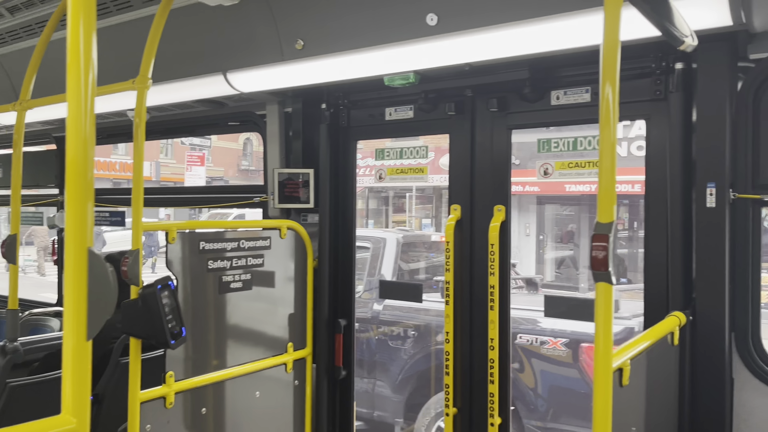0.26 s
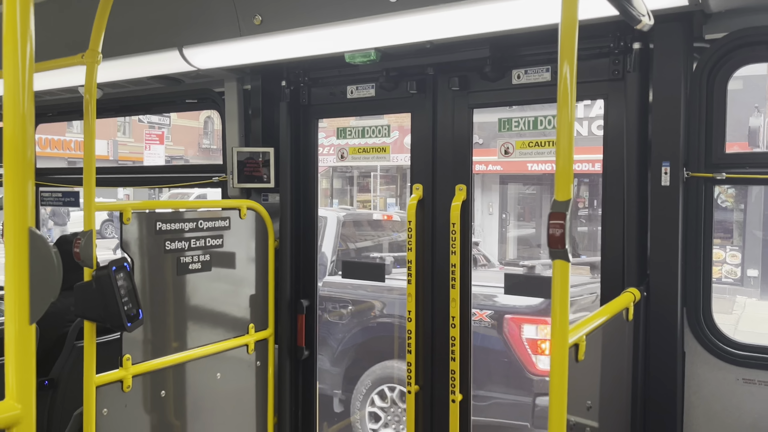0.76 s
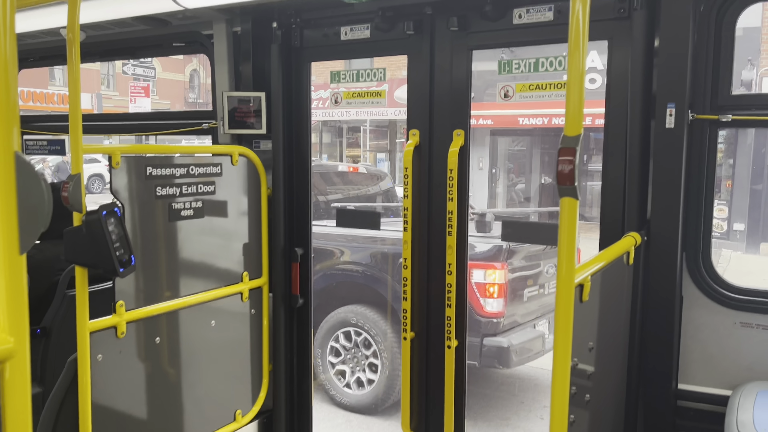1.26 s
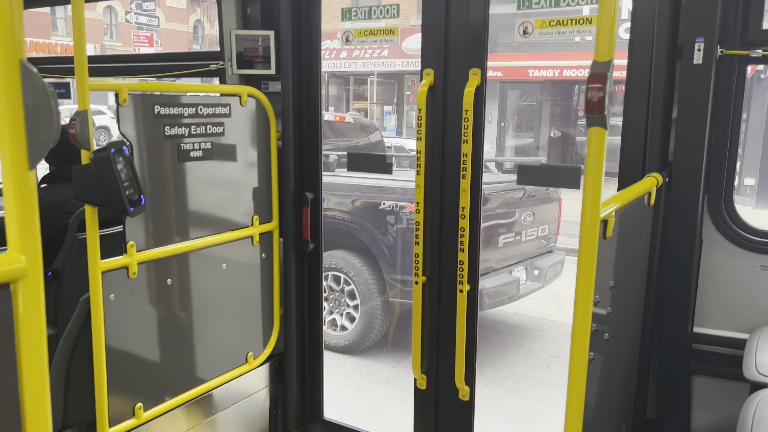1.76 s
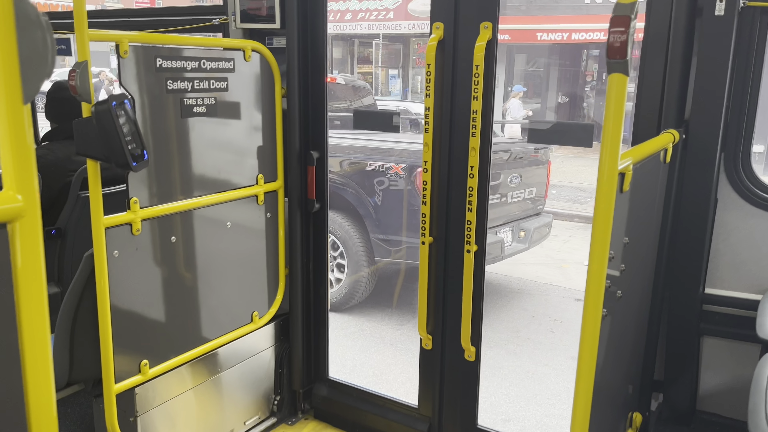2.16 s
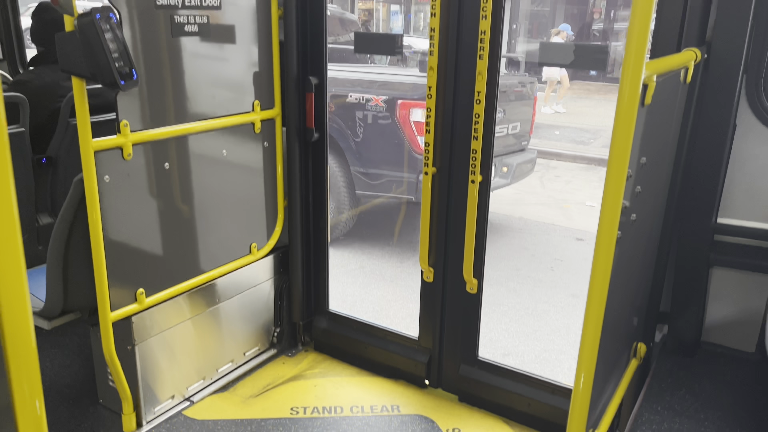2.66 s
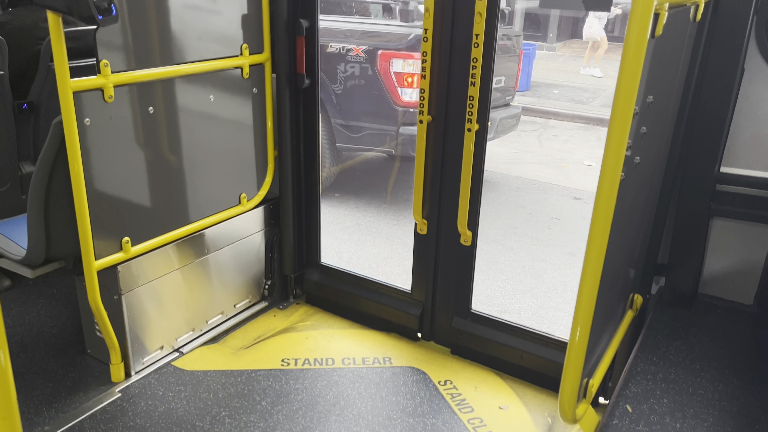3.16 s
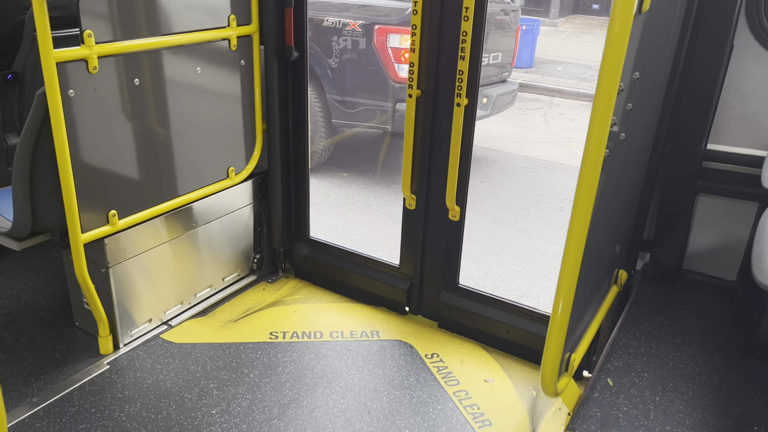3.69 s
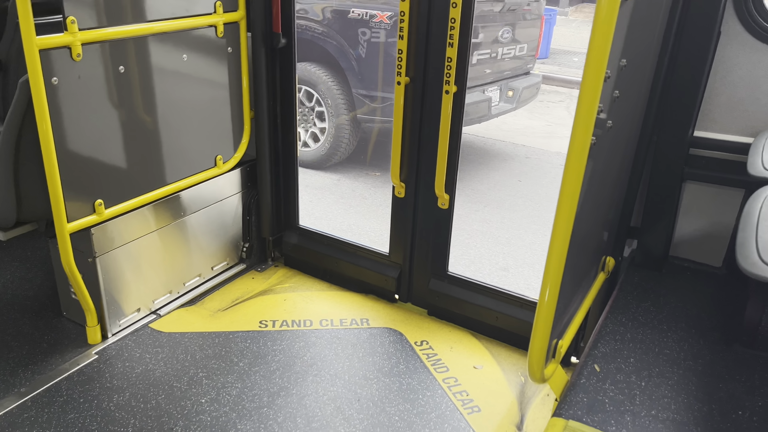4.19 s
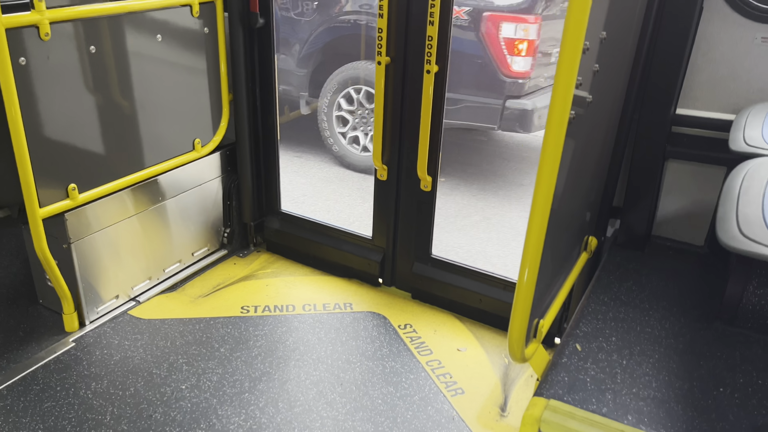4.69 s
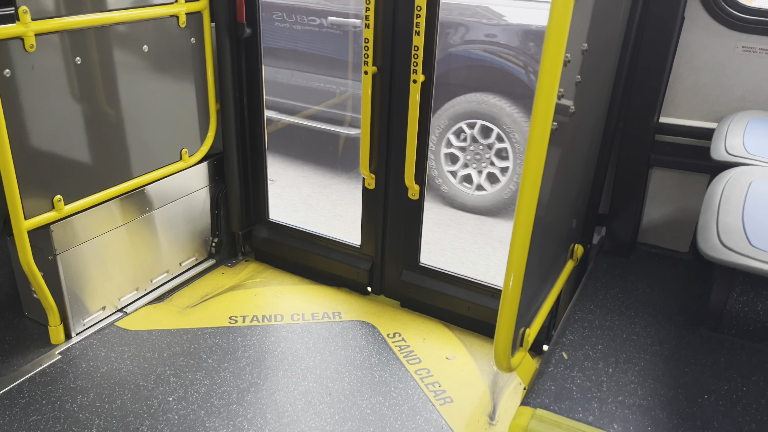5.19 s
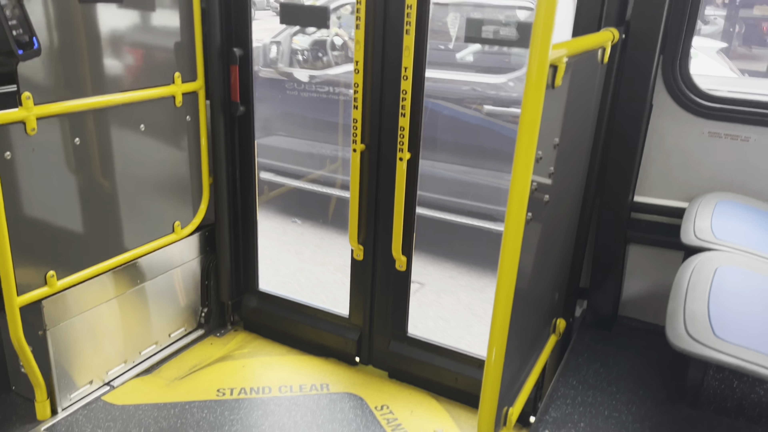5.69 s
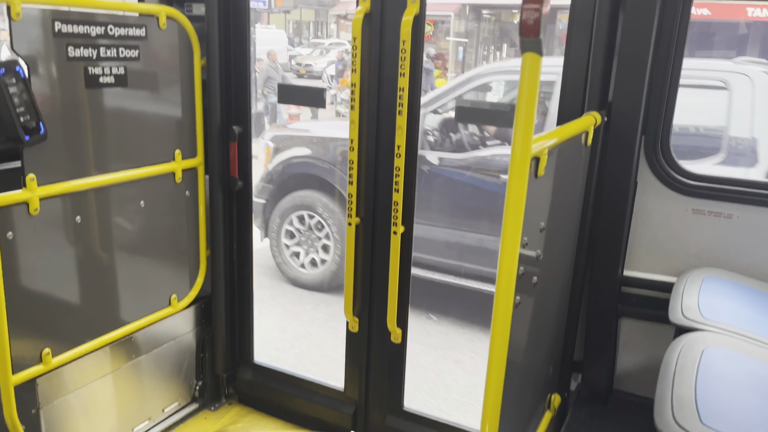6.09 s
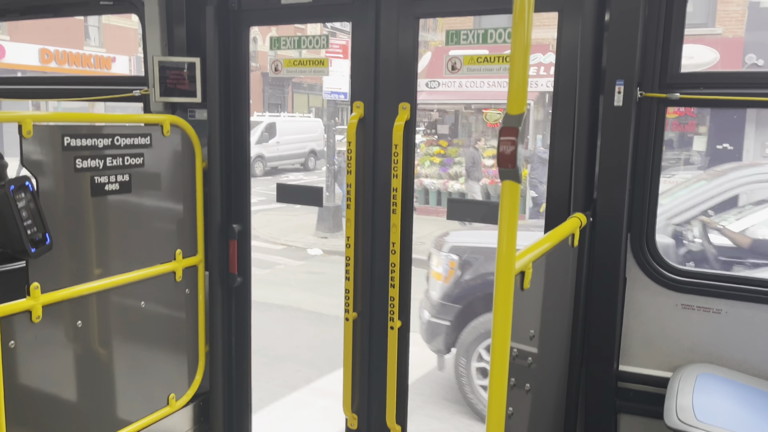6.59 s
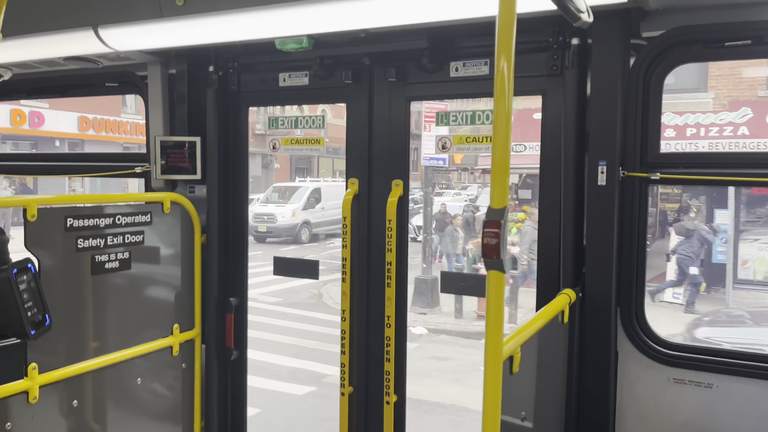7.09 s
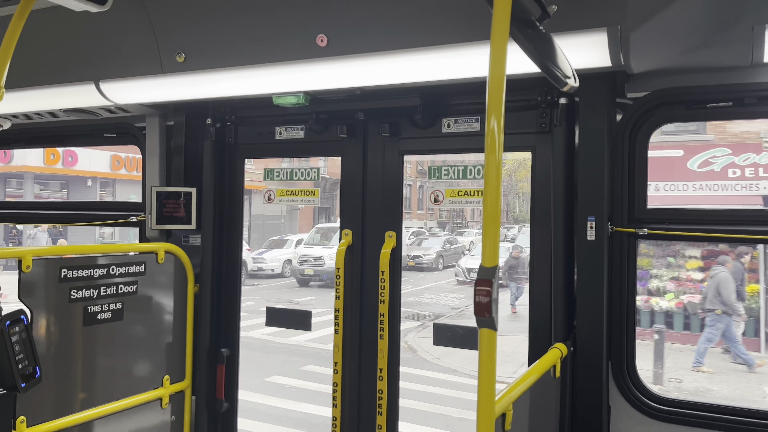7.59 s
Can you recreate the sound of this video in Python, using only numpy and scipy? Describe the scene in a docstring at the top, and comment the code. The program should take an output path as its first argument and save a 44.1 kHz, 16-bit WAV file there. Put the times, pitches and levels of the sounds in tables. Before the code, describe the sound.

Steady cabin hum, airy ventilation and soft bumps, then an electric drive rises from deep throb to smooth mid-low whine, booming on the way.

```python
"""Inside an electric bus near the rear door, heard by a hand-held phone: it creeps along, then pulls away.
The drive is a sine whose pitch rises with speed and booms on each cabin resonance that it crosses.
Hum, whines and fan tones are sines; the whines change level as the phone is lowered and lifted.
Floor rumble, tyre roar, rushing air and wind are shaped noise, diffuse at the phone's two ports.
Soft bumps, clicks, short hisses, a squeak, a whirr and a thin inverter whine come and go."""
import sys
import numpy as np
from scipy import signal
from scipy.fft import rfft, irfft
from scipy.io import wavfile
from scipy.ndimage import uniform_filter1d

SR = 44100
rng = np.random.default_rng(int(sys.argv[2]) if len(sys.argv) > 2 else 0)


def store_wav(level_fs):
    """Save 16-bit WAV to argv[1]."""
    pcm = np.round(np.clip(np.atleast_2d(level_fs), -1, 1) * 32767)
    wavfile.write(sys.argv[1], SR, pcm.T.astype(np.int16))


N = 346185
T = np.arange(N) / SR
FREQ = np.fft.rfftfreq(N, 1 / SR) + 1e-3  # kept above zero for the logarithms

# Drive tone, proportional to the speed of the bus: (time [s], pitch [Hz])
DRIVE_PITCH = [(3.5, 25.2), (3.85, 41.8), (4.19, 63.9), (5.75, 189.2), (6.3, 226.8), (6.88, 260.5),
               (7.85, 296.1)]
# Weaker orders of the drive, before the cabin response:
# (multiple of the pitch [1], loudest at [s], half length [s], level against the main tone [dB])
DRIVE_ORDERS = [(3.12, 4.14, 0.45, -10), (.333, 6.3, 0.94, -11), (.75, 6.5, 0.15, -19.5),
                (2.07, 7.8, 0.22, -19)]
# Stereo place of the drive tone: (pitch [Hz], left minus right [dB])
DRIVE_PAN = [(88, 0), (106, 3), (128, 6.5), (145, 1.5), (260, -3)]
# Cabin resonances crossed by the drive: (centre [Hz], width [Hz], rms of the tone from this mode alone [dB])
CABIN_MODES = [(47, 12, -34.5), (55, 7, -30), (64.2, 7.5, -20.5), (73.9, 8.7, -20.5), (83.5, 6.2, -29),
               (87, 8.5, -27.5), (97.6, 9.1, -26.5), (108.7, 11, -25), (123.5, 12, -25.5),
               (131.1, 8.2, -23.5), (140.3, 6.2, -27), (174.4, 6.8, -24), (182.5, 9.9, -23),
               (188.3, 5.9, -23.5), (203.6, 5.8, -32.5), (211.8, 11.2, -29.5), (223.5, 12, -39),
               (263.3, 15, -43), (288, 23.3, -36.5), (610, 40, -29)]
# Compressor hum: (time [s], rms, mean of both ports [dB], left minus right [dB])
HUM_LEVEL = [(.7, -40, 5), (1.6, -35.5, 3), (3.2, -31.5, 0), (4.5, -36, 3.5), (6.4, -36.5, 3),
             (6.9, -42, 7), (7.4, -37.5, 11), (7.85, -43, 10)]
# Steady whines, before the standing-wave changes: (pitch [Hz], left peak [dB], right peak [dB],
# left lead at even steps of the phone from raised to lowered [rad])
WHINES = [(415.4, -44.5, -44.5, (-.3, .2, .7, 0, .2, .5, .3)),
          (431.9, -36.8, -37, (-.8, -.4, -.2, .1, -.6, -.5, -.6)),
          (699.7, -58, -58, (-3.8, -1.2, 1.2, 2.8, 2.1, 2, 1.9)),
          (863.8, -42, -46.5, (-2.4, -2.8, -3.6, -1.5, .6, .4, -.4)),
          (1049.7, -46, -52, (2.3, 1.5, 1.4, 1.8, 1.9, 2.6, 3.7)),
          (1295.6, -41.5, -39.5, (.4, 1.3, 1.8, 1.6, 3, 2.8, 2.6)),
          (1421.2, -48.5, -49.5, (-2.4, -1.7, -2, -2.4, -1.1, -.2, -.7)),
          (1727.7, -51.5, -51.5, (2.8, 2, -.2, -1.2, -1.4, -2.4, -1.7))]
# Nodes and crests of the standing waves, listed under the pitch of each tone [Hz]:
# (time [s], half length [s], left change [dB], right change [dB])
NODES = {415.4: [(.85, .45, 9, 8), (7.3, .5, 4, 0)], 431.9: [(.4, .75, 0, -24), (6.5, .5, 4, 0),
         (7.6, .65, 0, -15)], 699.7: [(4.4, 1.2, 10, 11)], 863.8: [(.8, .9, -9, -5), (2.25, .22, -18, 0),
         (6.42, .17, -15, 0), (7.4, .7, -13, -9)], 1049.7: [(.9, .65, -15, -7), (3.3, .6, 3, -11),
         (4.4, .07, -12, 0), (5.15, .22, -15, -10), (6, .13, -16, -2), (6.8, .35, 0, 2), (7.9, .5, -9, 0)],
         1295.6: [(.3, .7, -2, -3), (1.4, .3, -2, -4), (2, .34, -18, -20), (2.58, .1, -12, 0),
         (6.55, .25, -16, -7), (7.2, 1.6, -8, -8), (7.65, .4, 3, 3)], 1421.2: [(1.95, .25, -14, -12),
         (2.9, .6, -6, -8), (6.8, .65, -12, -13)], 1727.7: [(1, .4, -9, 0), (1.8, .13, 0, -18),
         (2.2, .18, -4, -3), (3.8, .4, -3, -22), (5.95, .15, -18, -12), (6.45, .2, 3, 2),
         (7.1, .2, -7, -4)], 2327.5: [(1.4, .25, 6, 2)], 2437: [(3.1, .18, 8, 3), (3.9, .28, 9, 6)],
         5183: [(.4, .4, 3, 4), (3.05, .12, 6, 0), (3.8, .1, 4, 0), (6.95, .3, 7, 0)]}
# Height of the phone as the hand lowers and lifts it: (time [s], 0 raised to 1 lowered [1])
PHONE_DIP = [(0, .05), (1.1, .07), (1.9, .39), (2.4, .56), (3.3, .73), (4.6, .98), (5.7, .94), (6.3, .47),
             (7, .26), (7.3, .14), (7.85, .1)]
# Soft bumps through the floor: (time [s], centre [Hz], rms at the peak [dB], half length [s])
BUMPS = [(0.143, 82.9, -24.5, 0.018), (0.786, 82, -26, 0.03), (1.456, 97.9, -25.5, 0.014),
         (2.31, 331, -43, .025), (2.336, 220.3, -34, 0.035), (2.442, 172, -39, 0.042),
         (2.527, 191, -32, 0.02), (2.578, 80.2, -33, 0.015), (6.967, 155, -35.5, 0.044),
         (7.415, 99.4, -29.5, 0.026)]
# Clicks of loose fittings: (time [s], centre [Hz], width [Hz], level before the envelope [dB], decay [s])
CLICKS = [(2.3, 2450, 250, -52, .09), (2.405, 2500, 400, -42.5, .008), (2.498, 3800, 2000, -47.5, .003),
          (2.549, 3000, 1800, -45, .005), (4.229, 3800, 2500, -44, .002), (6.03, 4800, 2500, -50, .002),
          (6.1047, 4700, 1200, -46, .002), (6.936, 6000, 4030, -54, .002), (7.564, 1650, 400, -37, .005),
          (7.577, 800, 450, -37, 0.0071), (7.631, 1500, 450, -45, .007), (7.648, 1550, 400, -46, .006),
          (7.698, 850, 500, -47, .007)]
# Short hisses and ticks: (time [s], level [dB], rise [s], decay time constant [s], treble share [dB])
HISSES = [(.74, -4.5, .01, 0.068, -20), (2.36, -9.5, .07, 0.067, 6), (2.44, -8.5, 0.057, 0.17, 1.5),
          (3.24, -15, 0.033, 0.055, 6), (3.315, -12, .006, 0.064, 10.5), (3.48, -19, .06, 0.083, 9),
          (4.229, -0.5, 0.01, 0.075, 5.5), (4.28, -16, .025, 0.04, 0), (5.88, -13, .1, 0.1, 2),
          (6.03, -10, .005, 0.049, 6), (6.104, -11.5, .003, 0.043, 9.5), (6.936, -10, 0.0018, 0.052, 8),
          (7.628, -5, 0.011, 0.053, -2), (7.718, -9, .001, 0.036, 2)]
# Squeak of a panel, one row: (time [s], centre [Hz], rms at the peak [dB], half length [s])
SQUEAK = (7.549, 1590, -45.5, .013)
# Two passes of a faint whirr: (loudest at [s], top pitch [Hz], rms at the peak [dB])
WHIRR = [(2.05, 1562, -53.5), (6.85, 1560, -54.5)]
# Surfacings of the inverter whine, before panning: (loudest at [s], half length [s], peak [dB])
INVERTER = [(4.93, .12, -65), (5.9, 0.11, -60), (6.62, .12, -60), (7.5, .2, -62)]
# Fan tones, before fading and standing waves: (pitch [Hz], peak [dB], left minus right [dB])
FAN_TONES = [(721, -56.5, 0), (960, -61, 3), (2327.5, -62.5, 2), (2437, -65, 3), (4320, -72, 6),
             (5183, -71, 7)]
# Cabin resonances kept ringing by road and air:
# (centre [Hz], width [Hz], rms at even steps of the phone from raised to lowered [dB])
BOOMS = [(223, 40, (-53, -58, -52, -44, -43.5)), (543, 40, (-49.5, -49.5, -61, -64, -62.5)),
         (749, 220, (-58, -72, -57, -54.5, -54))]
# Noise spectra, before the level changes in their functions: (frequency [Hz], density [dB per Hz])
RUMBLE = [(15, -100), (22, -83), (32, -67), (45, -56.5), (62, -53), (80, -54), (95, -56), (140, -59.5),
          (175, -60), (200, -69), (270, -67.5), (400, -82.5), (900, -100)]
TYRES = [(100, -88), (200, -71), (270, -68), (330, -65.5), (390, -66.5), (490, -68.5), (610, -80),
         (850, -80), (1200, -80), (2500, -100)]
WIND = [(450, -79), (620, -71), (850, -79), (1200, -83), (1900, -87.5)]  # at full speed
AIR = [(150, -100), (400, -76.5), (800, -72), (1050, -76.5), (1500, -74.5), (1950, -79.5), (2450, -78.5),
       (3200, -86.5), (4200, -89), (5200, -93.5), (6500, -101), (8000, -108), (10000, -105.5),
       (13000, -107.5), (14000, -114)]
VENT = [(1200, -100), (2400, -90.5), (3200, -86.5), (4300, -84), (5200, -89.5), (6500, -96), (8000, -116)]  # at the left port
HISS = [(1500, -87), (2600, -77), (4500, -78.5), (6500, -88), (8200, -101), (10500, -94.5), (13000, -98.5),
        (15000, -102)]


def drive(left_lag_ms=0.19, flutter_db=0.9):
    """Forced resonance: a tone locked to speed, with its weaker orders, excites the cabin modes it crosses."""
    pitch = curve(DRIVE_PITCH)
    phase = turn(pitch * (1 + 0.0015 * walk(20)))
    moving = np.clip(2 * (pitch / pitch[0] - 1), 0, 1)  # silent at the starting pitch
    pan_db = np.interp(pitch, *np.transpose(DRIVE_PAN))
    strength = moving * cabin_response(pitch) * undb(flutter_db * walk(25) + sides(pan_db))
    out = strength * np.sin(phase + lag_phase(pitch, left_lag_ms))
    for multiple, s, half_length, db in DRIVE_ORDERS:
        strength = undb(db) * swell(s, half_length) * cabin_response(multiple * pitch)
        out = out + strength * np.sin(multiple * phase + 0.34 * walk(25))
    return np.sqrt(2) * out  # rms to peak


def cabin_response(pitch):
    """Modal superposition: the powers of all the cabin resonances add at the given pitch."""
    power = 0
    for hz, width_hz, db in CABIN_MODES:
        detuning = (pitch - hz) / width_hz
        power = power + (undb(db) / (1 + 2 * detuning ** 2) ** 2) ** 2
    return np.sqrt(power)


def compressor_hum(hum_hz=107.97, left_lead_rad=0.14):
    """Periodic rotation: the compressor's hum is one sine of nearly constant pitch."""
    shaft = turn(hum_hz + 0.15 * walk(3.88))
    pan_db = curve(HUM_LEVEL, axis=2)
    return np.sqrt(2) * undb(curve(HUM_LEVEL) + sides(pan_db)) * np.sin(shaft + sides(left_lead_rad))


def machine_whines(waver_db=1, phase_waver_rad=0.09):
    """Standing waves: steady compressor and fan whines vary in level and phase with the phone's place."""
    out = 0
    for hz, left_db, right_db, leads in WHINES:
        db = np.array([[left_db], [right_db]]) + standing(hz) + waver_db * walk(5.9)
        phase = 2 * np.pi * (hz * T + rng.random()) + phase_waver_rad * walk(16)
        out = out + undb(db) * np.sin(phase + sides(at_phone(leads)))
    return out


def bumps(pitch_spread=0.1384):
    """Impulsive excitation: each bump shakes the body for a few uneven cycles."""
    out = 0
    for s, hz, db, half_length in BUMPS:
        shake = np.sqrt(2) * np.sin(turn(hz * (1 + pitch_spread * walk(150))))
        out = out + undb(db) * swell(s, half_length) * shake
    return out


def clicks(rise_s=0.00055):
    """Damped vibration: loose fittings click with a sharp onset and an exponentially dying ring."""
    out = 0
    for s, hz, width_hz, db, decay in CLICKS:
        out = out + undb(db) * burst(s, rise_s, decay) * narrow(hz, width_hz)
    return out


def hisses(split_hz=7000, grain_db=1.2):
    """Transient broadband noise: short hisses, whose treble above the split is one signal at both ports."""
    low_pass = signal.butter(4, split_hz, fs=SR, output="sos")
    high_pass = signal.butter(4, split_hz, "high", fs=SR, output="sos")
    body = signal.sosfilt(low_pass, diffuse(HISS, likeness=0.74))
    top = signal.sosfilt(high_pass, diffuse(HISS, likeness=.8)[0])
    out = 0
    for s, db, rise, decay, treble_db in HISSES:
        out = out + undb(db) * burst(s, rise, decay) * (body + undb(treble_db) * top)
    return out * undb(grain_db * walk(120))


def panel_squeak(width_hz=230):
    """Narrow-band vibration: one rough squeak of a panel, independent at the two ports."""
    s, hz, db, half_length = SQUEAK
    return undb(db) * swell(s, half_length) * narrow_pair(hz, width_hz)


def whirr(half_length_s=.45, sag_hz=28, width_hz=36):
    """Narrow-band noise on a parabolic glide: a faint whirr rises to its top pitch and sinks again."""
    out = 0
    for s, hz, db in WHIRR:
        away = ((T - s) / half_length_s) ** 2
        out = out + undb(db) * np.exp(-away / 2) * narrow_pair(hz - sag_hz * away, width_hz)
    return out


def inverter(whine_hz=4000, pan_db=9, waver_hz=3):
    """Switching tone: the inverter's thin whine, stronger on the left, surfaces at the listed times."""
    strength = sum(undb(db) * swell(s, half_length) for s, half_length, db in INVERTER)
    phase = turn(whine_hz + waver_hz * walk(20))
    lead = 2 * walk(2.02)
    return strength * undb(sides(pan_db)) * np.sin(phase + sides(lead))


def fan_tones(fading_db=2.2, waver_hz=2.5):
    """Fading of short waves: faint fan tones whose level, pitch and lead between the ports wander."""
    out = 0
    for hz, db, pan_db in FAN_TONES:
        lead = np.pi / 2 + 0.6 * walk(2.52)
        strength = undb(db + standing(hz) + fading_db * walk(8.7) + sides(pan_db))
        out = out + strength * np.sin(turn(hz + waver_hz * walk(8)) + sides(lead))
    return out


def cabin_booms():
    """Noise-driven resonance: narrow bands kept ringing, their levels set by the phone's place."""
    out = 0
    for hz, width_hz, places_db in BOOMS:
        out = out + undb(at_phone(places_db)) * narrow(hz, width_hz)
    return out


def floor_rumble(waver_db=-1.23):
    """Structure-borne noise: the road's low rumble through the floor grows with speed."""
    level_db = with_speed(creeping_db=-1.27, added_db=2.2) + waver_db * walk(2.11)
    return diffuse(RUMBLE, likeness=0.76, left_lag_ms=.35) * undb(level_db)


def tyre_roar(pan_db=1.0, waver_db=0.97):
    """Rolling noise: tyre roar, whose added level sets in only near full speed."""
    level_db = with_speed(creeping_db=0.95, added_db=2.6, power=12) + waver_db * walk(10)
    return diffuse(TYRES, likeness=1.0, left_lag_ms=.17) * undb(level_db + sides(pan_db))


def wind(waver_db=3.5, speed_power=0.67):
    """Flow noise: air streams past the body with an amplitude that follows a power of the speed."""
    return diffuse(WIND, likeness=0.32) * speed() ** speed_power * undb(waver_db * walk(6))


def air_conditioning(vent_pan_db=18, air_waver_db=.4, vent_waver_db=0.35, duct_echo=0.13):
    """Turbulent noise and comb filtering: diffuse air and a left vent, coloured by short duct echoes."""
    air_db = with_speed(creeping_db=-2.92, added_db=0.21) + air_waver_db * walk(9)
    air = diffuse(AIR, likeness=0.13) * undb(air_db)
    # the left port keeps its level; only the right one is lowered
    vent_db = sides(vent_pan_db) - vent_pan_db / 2 + vent_waver_db * walk(4)
    flow = air + diffuse(VENT, likeness=.3) * undb(vent_db)
    lags = rng.integers(SR // 300, SR // 40, size=6)  # samples
    echoes = sum(np.roll(flow, lag, axis=1) for lag in lags)
    return flow + duct_echo * echoes


def speed():
    """Proportionality of pitch and speed: the bus speed as a share of the highest that it reaches."""
    pitch = curve(DRIVE_PITCH)
    return pitch / pitch.max()


def with_speed(creeping_db, added_db, power=1):
    """Speed law: a base level in dB and a part that grows with a power of the speed."""
    return creeping_db + added_db * speed() ** power


def at_phone(places):
    """Spatial sampling: a quantity of the sound field, followed between raised and lowered phone."""
    return np.interp(curve(PHONE_DIP), np.linspace(0, 1, len(places)), places)


def standing(hz):
    """Nodes and crests: change in dB at each port as the phone drifts through one standing wave."""
    return sum(np.outer(change_db, swell(s, half_length))
               for s, half_length, *change_db in NODES.get(hz, []))


def diffuse(spectrum, likeness, left_lag_ms=0, port_gap_m=0.27, sound_speed=343):
    """Diffuse-field coherence: noise alike at two spaced ports in the bass, unrelated higher up."""
    hz, db = np.transpose(spectrum)
    octaves_outside = np.abs(np.log2(FREQ / np.clip(FREQ, hz[0], hz[-1])))
    density_db = np.interp(np.log(FREQ), np.log(hz), db) - 20 * octaves_outside
    gain = undb(density_db) * np.sqrt(SR / 2)
    alike = np.clip(likeness, 0, 1) * np.sinc(2 * FREQ * port_gap_m / sound_speed)
    shares = np.sqrt([(1 + alike) / 2, (1 - alike) / 2])
    mid, side = rfft(rng.standard_normal((2, N))) * gain * shares
    ports = np.array([mid + side, mid - side])
    return irfft(ports * np.exp(1j * lag_phase(FREQ, left_lag_ms)), N)


def lag_phase(hz, left_lag_ms):
    """Propagation delay: phase at each port of a wave that reaches the left one later."""
    return sides(-2 * np.pi * hz * left_lag_ms / 1000)


def sides(difference):
    """Symmetric stereo split: half of a left-minus-right difference to each channel."""
    return np.array([[.5], [-.5]]) * difference


def narrow(hz, width_hz):
    """Quadrature modulation: two slow random walks on sine and cosine give a noise band of rms near 1."""
    phase = turn(hz + np.zeros(N))
    return walk(width_hz) * np.sin(phase) + walk(width_hz) * np.cos(phase)


def narrow_pair(hz, width_hz):
    """Incoherence: independent narrow bands at the two ports."""
    return np.array([narrow(hz, width_hz) for _ in range(2)])


def burst(start, rise, decay):
    """Exponential decay: an envelope that swells up to its start time and then dies away."""
    age = T - start
    return np.exp(np.where(age < 0, -(age / rise) ** 2, -age / decay))


def swell(centre, half_length):
    """Gaussian envelope: a bell whose standard deviation is the half length."""
    return np.exp(-((T - centre) / half_length) ** 2 / 2)


def turn(hz):
    """Phase as the integral of frequency, in radians, from a random start."""
    return 2 * np.pi * (np.cumsum(hz) / SR + rng.random())


def walk(rate):
    """Smoothed random steps: a wander with a spread near 1, at the given steps per second."""
    k = int(SR / max(rate, .5))
    held = np.repeat(rng.standard_normal(N // k + 2), k)
    smooth = uniform_filter1d(uniform_filter1d(held, k), k)
    return 1.248 * smooth[:N]  # restores the spread lost in smoothing


def curve(rows, axis=1):
    """Linear interpolation: one column of a table, joined by straight lines in time."""
    rows = np.array(rows)
    return np.interp(T, rows[:, 0], rows[:, axis])


def undb(db):
    """Logarithmic level: decibels to amplitude gain."""
    return np.exp(np.asarray(db) * np.log(10) / 20)


def scene():
    """Linear superposition: the pressures of all sources in the cabin add."""
    machines = drive() + compressor_hum() + machine_whines() + whirr() + inverter() + fan_tones()
    events = bumps() + clicks() + hisses() + panel_squeak()
    background = cabin_booms() + floor_rumble() + tyre_roar() + wind() + air_conditioning()
    return machines + events + background


def record(dry, top_hz=14400):
    """Band limitation: a 4 ms fade-in avoids a click, and an elliptic low-pass cuts the top."""
    opening = np.minimum(T / .004, 1)
    low_pass = signal.ellip(8, .2, 70, top_hz, fs=SR, output="sos")
    return signal.sosfilt(low_pass, dry * opening)


dry = scene()
out = record(dry)
store_wav(out)
```